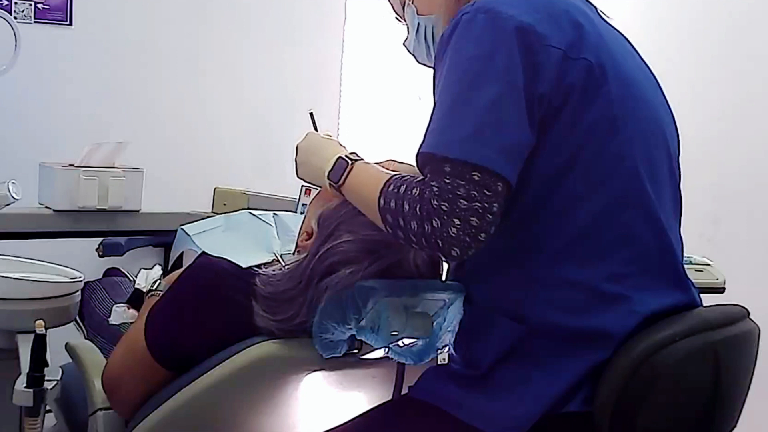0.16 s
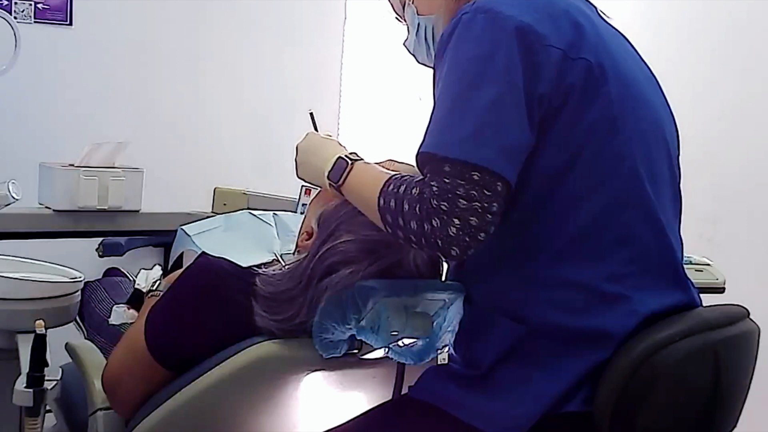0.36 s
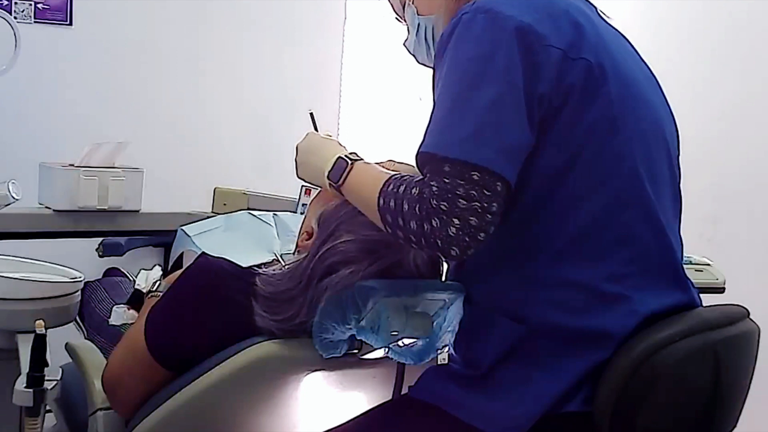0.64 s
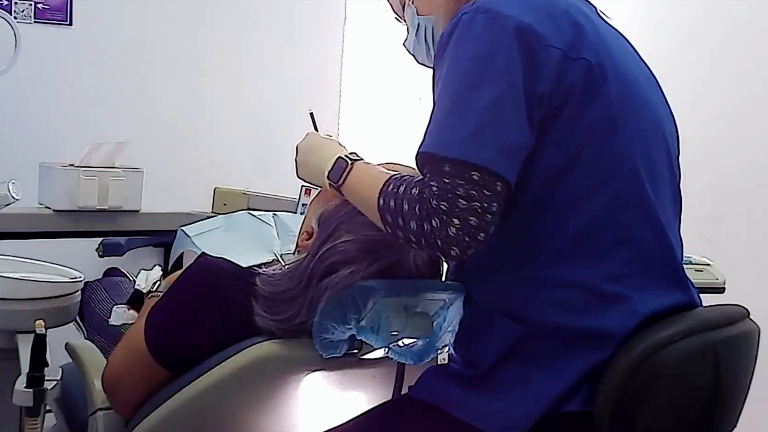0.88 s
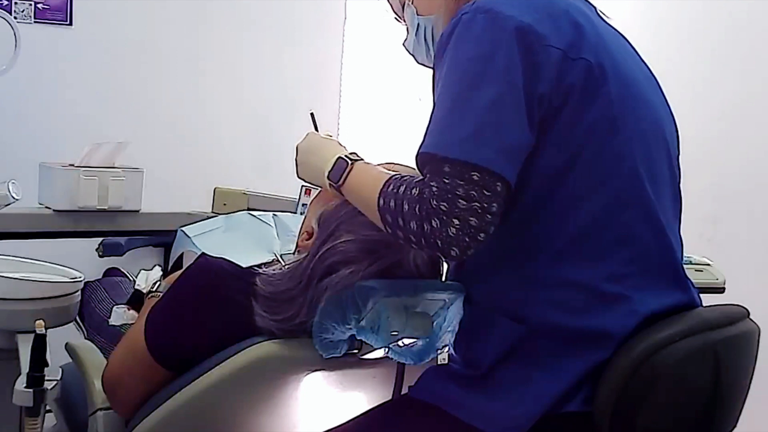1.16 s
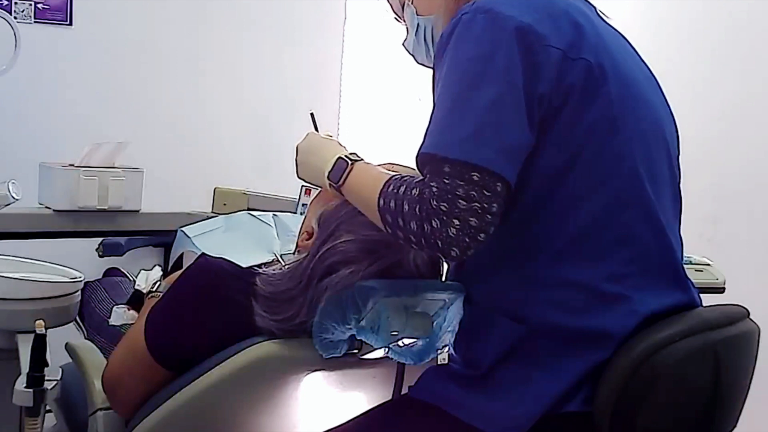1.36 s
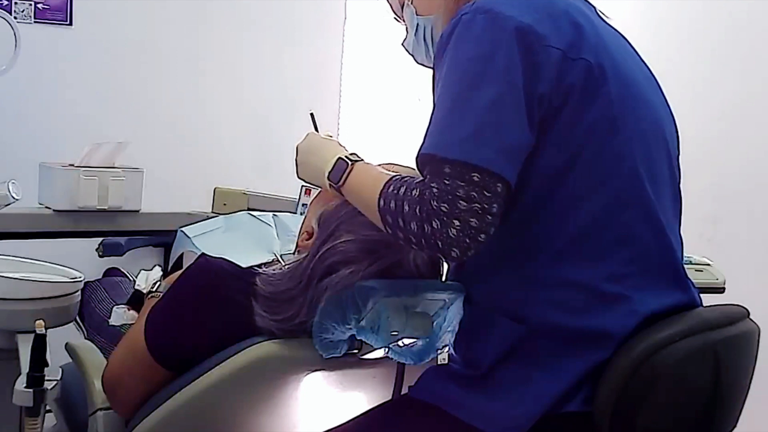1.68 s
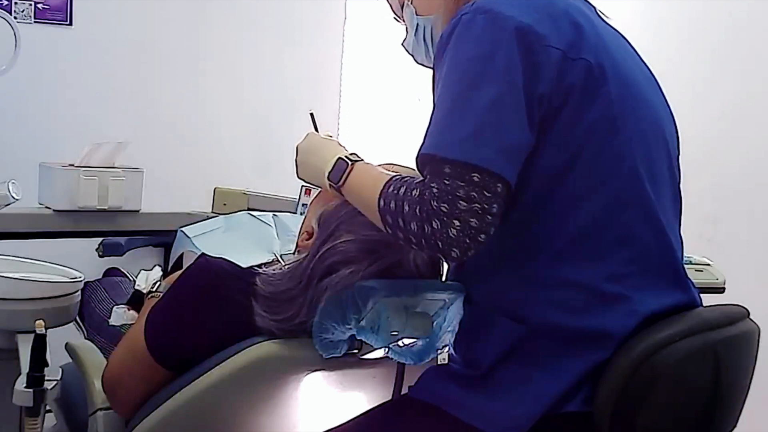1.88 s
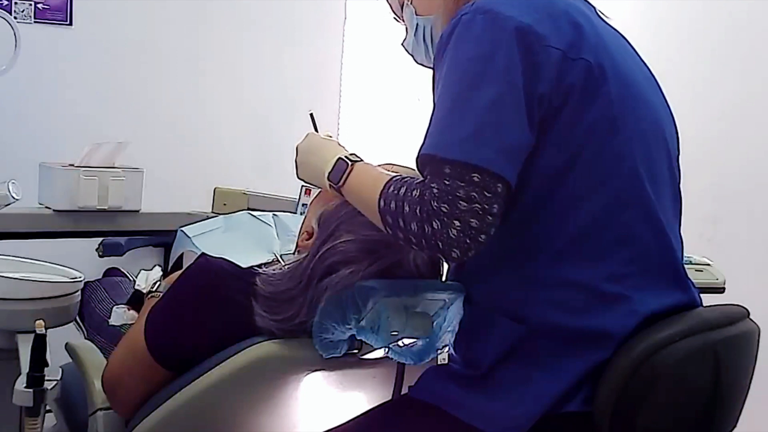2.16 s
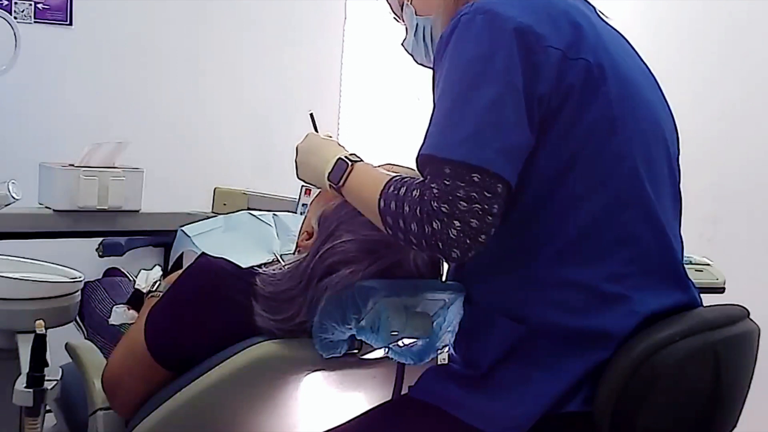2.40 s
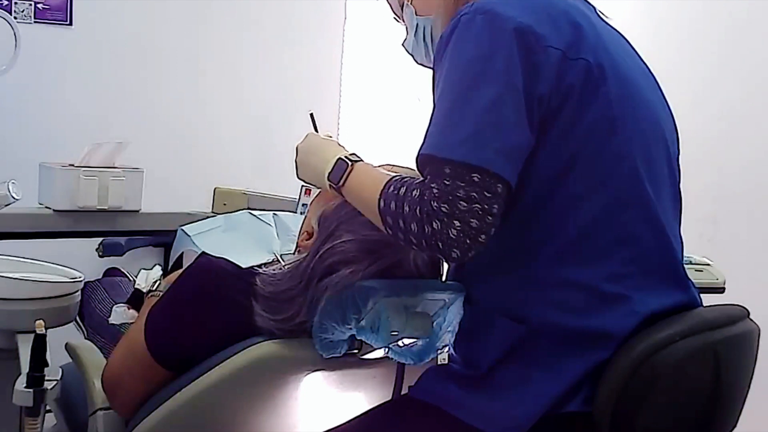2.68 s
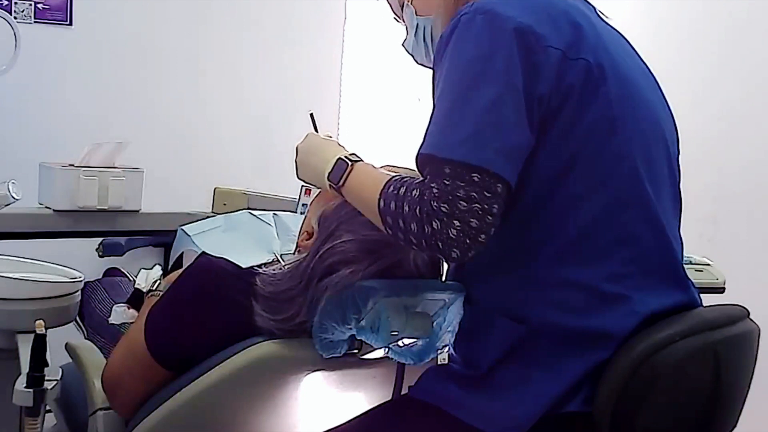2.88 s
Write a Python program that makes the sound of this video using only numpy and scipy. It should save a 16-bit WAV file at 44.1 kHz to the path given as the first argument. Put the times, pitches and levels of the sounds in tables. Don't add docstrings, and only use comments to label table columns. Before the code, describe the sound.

Dental suction hisses wetly from the start, with wavering whistles until about 0.5 s, then a sharp gulp at 0.8 s and gurgling until 1.2 s. An ultrasonic scaler sprays fine high mist and whines thinly, its spray weakening after 1.7 s. Brief gritty squeals continue, strongest at 2.5, 2.8 and 3 s. A compressor drones low; a chair creaks faintly near 2.9 s in the hard-walled room.

```python
import sys
import numpy as np
from scipy import signal
from scipy.fft import rfft, irfft, next_fast_len
from scipy.io import wavfile
from scipy.ndimage import uniform_filter1d, map_coordinates

SR = 44100
rng = np.random.default_rng(int(sys.argv[2]) if len(sys.argv) > 2 else 0)


def int16_out(signal):
    q = np.round(np.clip(np.atleast_2d(signal).T, -1, 1) * 32767)
    wavfile.write(sys.argv[1], SR, q.astype(np.int16))


def voltage_ratio(decibels):
    exponent = np.asarray(decibels, float) / 20
    return 10 ** exponent


N = 134064
TIME = np.arange(N) / SR
PATCH_DB, SHARED = 2, 0.16


def unit(x):
    return x / np.sqrt(np.mean(x ** 2) + 1e-20)


def along(points, hz):
    f, v = np.transpose(points)
    return np.interp(np.log(hz + 1), np.log(f + 1), v)


def curves(rows, t):
    s, *columns = np.transpose(rows)
    return [np.interp(t, s, column) for column in columns]


def wobble(rate):
    knots = rng.standard_normal(int(N * rate / SR) + 4)
    return map_coordinates(knots, [np.arange(N) * rate / SR])


def hum(hz, wander, rate):
    return np.sqrt(2) * np.sin(2 * np.pi * hz * TIME + wander * wobble(rate))


def filtered(x, response):
    m = next_fast_len(N + SR // 2)
    return irfft(rfft(x, m) * response(np.fft.rfftfreq(m, 1 / SR)), m)[..., :N]


def peaks(rows):
    def response(f):
        return np.sqrt(sum(voltage_ratio(2 * db) / (1 + (2 * (f - c) / w) ** 2) ** 2 for c, w, db in rows))
    return response


def patchy(patchy_db, shared=0):
    left, right, common = rng.standard_normal((3, N))
    share = np.clip(shared, 0, 1)
    pair = np.sqrt(1 - share) * np.array([left, right]) + np.sqrt(share) * common
    z = signal.stft(pair, nperseg=512)[2]
    field = rng.standard_normal(z.shape[1:])
    field = uniform_filter1d(uniform_filter1d(field, 6, 0), 12, 1)
    return signal.istft(z * voltage_ratio(patchy_db * unit(field)), nperseg=512)[1][:, :N]


def held(events, attack_s, release_s):
    level = 0
    for s, hold, db in events:
        rise = np.clip((TIME - s) / attack_s, 0, 1)
        level = level + voltage_ratio(db) * rise * np.exp(-np.maximum(TIME - s - hold, 0) / release_s)
    return level


# centre in Hz, width in Hz, level in dB.
DRONE_MODES = [(44, 9, -6), (68, 12, -10), (90, 18, -18), (398, 10, -28)]
# frequency in Hz, density in dB per Hz.
AIR_SPECTRUM = [(12, -31), (20, 1.5), (61, -10), (236, -19), (961, -29.5), (1250, -29), (2850, -33.5),
                (3730, -28), (6500, -39.5), (8450, -84), (14300, -120)]
# centre in Hz, width in Hz, level in dB.
CHAIR_MODES = [(70, 22, 6.5), (98, 33, 3.5), (140, 32, -4), (302, 180, -16.5)]
# frequency in Hz, left-right likeness [0 to 1].
LIKENESS = [(30, 0.99), (70, 0.52), (150, 0.4), (600, 0.48), (3000, 0.022)]


def machines():
    def pair(f):
        turn = np.arccos(np.clip(along(LIKENESS, f), -1, 1)) / 2
        return np.array([np.cos(turn), np.sin(turn)])

    drone = unit(filtered(rng.standard_normal((2, N)), lambda f: peaks(DRONE_MODES)(f) * pair(f)))
    air = unit(filtered(patchy(1.2), lambda f: voltage_ratio(along(AIR_SPECTRUM, f)) * pair(f) * (f < 7000)))
    chair = unit(filtered(patchy(1.0), lambda f: peaks(CHAIR_MODES)(f) * pair(f)))
    chair_s, chair_long_s = 2.9, 0.43
    creep = voltage_ratio(-62.5) * np.exp(-(2 * (TIME - chair_s) / chair_long_s) ** 2)
    mid, side = voltage_ratio(-62) * drone + voltage_ratio(-62.5) * air + creep * chair
    motor_db = -59.5 + 3 * wobble(5.91)
    mid = mid + voltage_ratio(motor_db) * hum(48.84, wander=0.81, rate=8)
    return np.array([mid + side, mid - side])


# time in seconds, fine spray in dB, coarse spray in dB.
MIST_LEVELS = [(0.0, -50, -64), (0.18, -57, -54.5), (0.41, -50, -52.5), (0.69, -49, -72),
               (0.84, -53.5, -71), (0.99, -48, -52), (1.13, -56, -51.5), (1.35, -52, -71),
               (1.44, -55.5, -56.5), (1.66, -56.5, -68), (2.5, -62, -74), (2.62, -59, -56),
               (2.69, -57, -63.5), (3.04, -59, -68)]
# frequency in Hz, density in dB per Hz.
FINE_SPECTRUM = [(6500, -23.5), (11000, -16), (13000, -1), (14300, 4), (15000, 3.5), (15800, -13)]
# centre in Hz, width in Hz, level in dB.
COARSE_MODES = [(9170, 1400, 0.5), (10350, 2000, -5.5), (12000, 1400, -4.5)]


def spray():
    fine_db, coarse_db = curves(MIST_LEVELS, TIME)
    fine = unit(filtered(patchy(3.2, SHARED), lambda f: voltage_ratio(along(FINE_SPECTRUM, f)) * (f > 5000)))
    coarse = unit(filtered(patchy(PATCH_DB, SHARED), peaks(COARSE_MODES)))
    fine_level = voltage_ratio(fine_db + 0.53 * wobble(28))
    coarse_level = voltage_ratio(coarse_db - 0.5 + 0.63 * wobble(9.8))
    return fine_level * fine + coarse_level * coarse


# start in seconds, end in seconds, pitch in Hz, width in Hz, level in dB.
WHINE_TONES = [(-.1, .13, 14430, 45, -58), (.13, 1.75, 14423, 40, -70), (1.75, 3.1, 14423, 30, -67.5),
               (-.1, .56, 10430, 60, -64), (.25, .55, 13950, 40, -68), (.9, 1.1, 14130, 25, -65),
               (1.08, 1.65, 13390, 60, -65), (1.06, 1.3, 15500, 60, -67), (1.4, 1.7, 9300, 70, -66),
               (1.85, 2.25, 9300, 80, -73), (1.25, 2.25, 3720, 170, -73), (1.2, 2.2, 4720, 90, -74.5),
               (-.1, .16, 3850, 300, -65.5), (.4, .55, 3850, 200, -72), (.8, .93, 3550, 90, -70),
               (1.07, 1.2, 6803, 30, -69), (1.07, 1.2, 9207, 25, -67), (1.67, 1.71, 7880, 60, -58),
               (2.09, 2.2, 7880, 90, -62), (2.34, 2.45, 7850, 110, -60), (2.5, 2.65, 7700, 90, -60),
               (2.8, 2.86, 7720, 90, -59), (2.8, 2.85, 12070, 80, -64), (2.03, 2.2, 7085, 90, -70),
               (2.55, 2.68, 9600, 150, -68), (-.1, .14, 4500, 450, -66), (.25, .44, 4600, 350, -71),
               (.8, 1.18, 4600, 800, -66), (1.03, 1.13, 11500, 300, -64), (2.96, 3.1, 7250, 200, -62)]


def whine():
    edge_s = 0.016
    out = 0
    for start, end, hz, wide, db in WHINE_TONES:
        tone = unit(filtered(rng.standard_normal((2, N)), peaks([(hz, wide, 0)])))
        spell = np.clip(np.minimum(TIME - start, end - TIME) / edge_s + .5, 0, 1)
        out = out + voltage_ratio(db + 1.5 * wobble(9.04)) * spell * tone
    return out


# centre in seconds, length in seconds, level in dB.
STROKES = [
    (0.518, 0.1, -68),
    (0.73, 0.06, -68),
    (0.98, 0.14, -64),
    (2.52, 0.1, -59),
    (2.6, 0.059, -67),
    (2.932, 0.054, -61),
    (3.006, 0.066, -56),
]
# centre in Hz, width in Hz, level in dB.
TOOTH_MODES = [(3150, 800, 0), (4400, 1500, -6), (11800, 900, -3)]


def scrape():
    stroke = sum(voltage_ratio(db) * np.exp(-(2 * (TIME - s) / long) ** 2) for s, long, db in STROKES)
    return stroke * unit(filtered(patchy(2.7, SHARED), peaks(TOOTH_MODES)))


# start in seconds, hold in seconds, level in dB.
ENAMEL_TOUCHES = [(0.209, 0.043, -53.5), (0.828, 0.11, -57), (0.981, 0.19, -54.5), (1.665, 0.016, -51),
                  (1.724, 0.038, -63), (1.858, 0.035, -68), (2.005, 0.078, -60.5), (2.1, 0.073, -56),
                  (2.329, 0.034, -53.5), (2.407, 0.12, -60), (2.49, 0.12, -52), (2.795, 0.028, -48.5),
                  (2.9, 0.083, -57), (2.96, 0.1, -51.5)]
# centre in Hz, width in Hz, level in dB.
SQUEAL_MODES = [(7170, 390, -8), (7810, 330, 0), (8330, 320, -8), (9600, 160, -19), (12260, 1050, -10)]


def squeal():
    press = voltage_ratio(-63) + held(ENAMEL_TOUCHES, attack_s=0.02, release_s=0.038)
    chatter = voltage_ratio(1.5 * wobble(30.08))
    return press * chatter * unit(filtered(patchy(1.5, SHARED), peaks(SQUEAL_MODES)))


# start in seconds, hold in seconds, level in dB.
GULPS = [
    (.8, 0.075, -53.5),
    (0.99, 0.19, -59.5),
    (-0.125, 0.14, -60.5),
]
# centre in Hz, width in Hz, level in dB.
GULP_MODES = [(3560, 410, 3.5), (4450, 530, -3), (6130, 1000, 3.5), (8200, 1800, -5), (11600, 560, -4)]


def slurps():
    gulp = held(GULPS, attack_s=0.013, release_s=0.035)
    return gulp * unit(filtered(patchy(PATCH_DB, SHARED), peaks(GULP_MODES)))


# centre in Hz, width in Hz, level in dB.
TUBE_MODES = [(3826, 270, 3.5), (4645, 530, -2), (5890, 190, -8.5), (9470, 64, 0), (10620, 67, 5.5),
              (11220, 790, -2)]
# frequency in Hz, density in dB per Hz.
JET_SPECTRUM = [(290, -34), (500, -17), (1010, -13), (1120, -11), (1920, -21), (5580, -12), (8010, 0),
                (13900, -14.5), (15800, -16)]
# time in seconds, air flow in dB, cavity strength in dB,
# cavity pitch in Hz, tube whistle in dB.
SUCTION_MOVES = [(0.0, -56.5, -60, 1180, -68), (0.08, -57, -59, 1120, -56.5), (0.2, -63, -70, 1140, -67.5),
                 (0.31, -56.5, -58, 1130, -54.5), (0.38, -63, -67, 1210, -65),
                 (0.43, -58, -61.5, 1170, -52), (0.57, -68, -77, 1180, -88), (0.785, -67.5, -72, 1340, -90),
                 (0.815, -57.5, -57, 1320, -70), (0.98, -61, -62, 1365, -74), (1.13, -56, -60.5, 1410, -78),
                 (1.26, -65.5, -67, 1283, -82), (1.77, -69, -68.5, 1246, -80), (2.4, -71, -77.5, 1270, -84),
                 (2.53, -68, -72, 1290, -84), (2.67, -72, -73, 1270, -79), (3.01, -66.5, -85, 1310, -88),
                 (3.04, -69, -80, 1340, -88)]


def mouth_cavity():
    f, t, z = signal.stft(patchy(0.84, shared=0.65), SR, nperseg=1024)
    pitch = curves(SUCTION_MOVES, t)[2]
    width_hz, skirt_hz = 190, 500
    off = 2 * (f[:, None] - pitch)
    upper_off = 2 * (f[:, None] - 1.22 * pitch)
    main = 1 / (1 + (off / width_hz) ** 2)
    skirt = voltage_ratio(-4) / (1 + (off / skirt_hz) ** 4)
    upper = voltage_ratio(-12) * (pitch > 1280) / (1 + (upper_off / width_hz) ** 2)
    return unit(signal.istft(z * (main + skirt + upper), SR, nperseg=1024)[1][:, :N])


def suction():
    flow_db, cavity_db, _, whistle_db = curves(SUCTION_MOVES, TIME)
    tube = peaks(TUBE_MODES)
    jet = filtered(patchy(PATCH_DB, SHARED),
                   lambda f: voltage_ratio(along(JET_SPECTRUM, f)) * (1 + 1.54 * tube(f)) * (f > 300))
    whistle = hum(1107, wander=1.5, rate=20) * voltage_ratio(3.5 * wobble(20))
    jet_level = voltage_ratio(flow_db + 8.5 + 0.89 * wobble(13.73))
    cavity_level = voltage_ratio(cavity_db + 1.3 * wobble(8.97))
    return jet_level * unit(jet) + cavity_level * mouth_cavity() + voltage_ratio(whistle_db - 0.5) * whistle


def room(x):
    t60_s, wet_db = 0.17, -1
    half = SR // 2
    t = np.arange(half) / SR
    tail = rng.standard_normal((2, half)) * voltage_ratio(-60 * t / t60_s) * (t > .003)
    tail = tail / np.linalg.norm(tail[0])
    led_in = np.c_[x[:, half:0:-1], x]
    wet = signal.fftconvolve(led_in, tail, axes=1)[:, half:half + N]
    return (x + voltage_ratio(wet_db) * wet) / np.sqrt(1 + voltage_ratio(2 * wet_db))


def scene():
    scaler = squeal() + spray() + whine() + scrape()
    return room(suction() + scaler + slurps()) + machines()


# frequency in Hz, left over right in dB.
PORT_LEAN = [(30, 2.5), (150, .5), (600, -1), (1200, -.5), (2000, -2), (3000, -6), (3700, -8), (5500, -.3),
             (14000, 1)]


def microphones(x):
    def colour(f):
        notch = -5 / (1 + (2 * (f - 5100) / 220) ** 2)
        return along(PORT_LEAN, f) / 2 * np.array([[1], [-1]]) + notch
    return filtered(x, lambda f: voltage_ratio(colour(f)))


# start in seconds, end in seconds.
OPEN_SPELLS = [(1.07, 1.29), (1.42, 1.78), (1.87, 2.09), (2.13, 2.22), (2.27, 2.46), (2.49, 2.64),
               (2.74, 2.81), (2.93, 3.01)]
# frequency in Hz, share dropped [0 to 1].
BAND_DROPS = [(3000, 0), (4000, .04), (5100, .14), (6500, .09), (7100, 0), (8800, .015), (10300, .03),
              (11300, .01), (12600, .05), (14500, .05)]
# frequency in Hz, share dropped [0 to 1].
LINE_DROPS = [(1800, 0), (2600, .12), (3600, .06), (5200, .15), (6800, .08), (8000, .04), (11000, .1),
              (12600, .2), (15500, .35)]


def thinned(x):
    f, t, z = signal.stft(x, SR, nperseg=1024)

    def blocks(high, long):
        draws = rng.random((len(f) // high + 1, len(t) // long + 1))
        return np.kron(draws, np.ones((high, long)))[:len(f), :len(t)]

    open_hz, closed_hz, spread_hz = 15720, 14950, 330
    is_open = sum((t > a) & (t < b) for a, b in OPEN_SPELLS) > 0
    steps = np.repeat(rng.standard_normal(len(t)), 3)[:len(t)]
    top = np.where(is_open, open_hz, np.minimum(closed_hz + spread_hz * steps, open_hz))
    band_kept = blocks(6, 5) >= along(BAND_DROPS, f)[:, None]
    line_kept = blocks(2, 4) >= along(LINE_DROPS, f)[:, None]
    size = uniform_filter1d(abs(z).mean(0), size=5, axis=1)
    strong = size > voltage_ratio(7) * uniform_filter1d(size, size=25, axis=0)
    keep = (strong | line_kept) & (f[:, None] < top) & band_kept
    return signal.istft(z * keep, SR, nperseg=1024)[1][:, :N]


def low_pass(x):
    return signal.sosfilt(signal.butter(12, 16070, fs=SR, output="sos"), x)


def record(dry):
    mix = thinned(microphones(dry)) - .0009
    return low_pass(mix)


dry = scene()
out = record(dry)
int16_out(out)
```